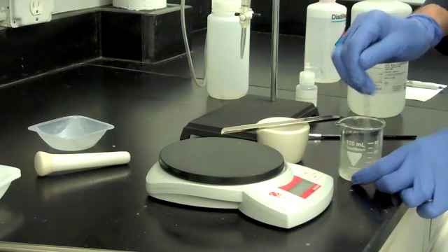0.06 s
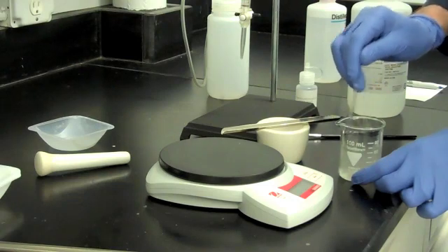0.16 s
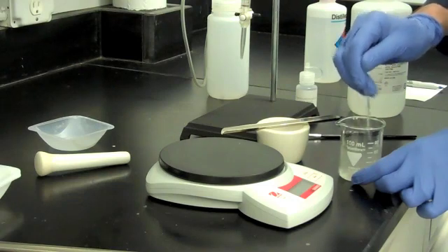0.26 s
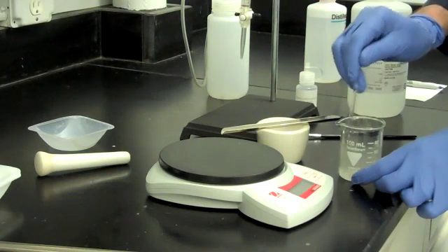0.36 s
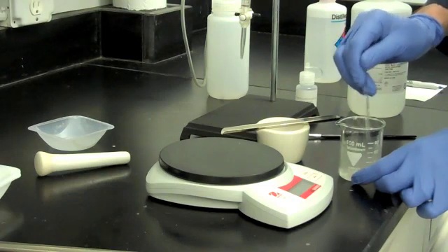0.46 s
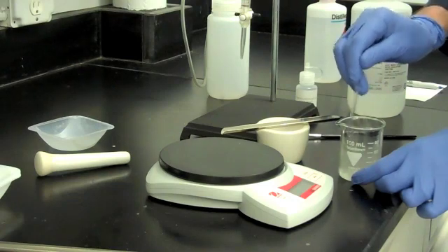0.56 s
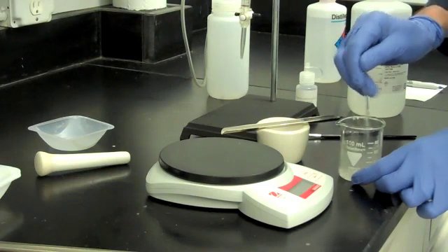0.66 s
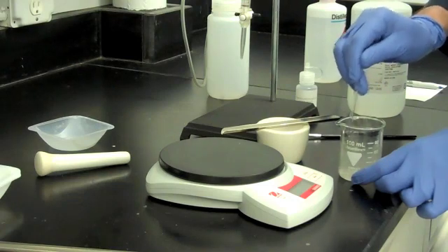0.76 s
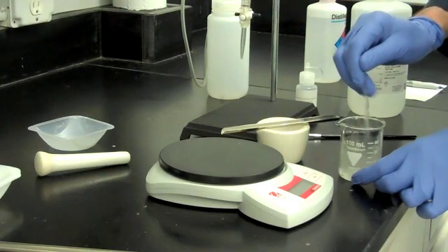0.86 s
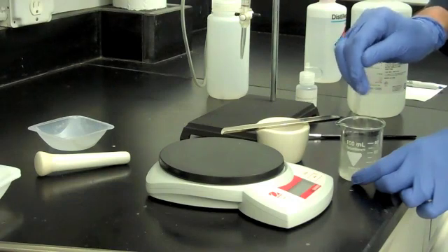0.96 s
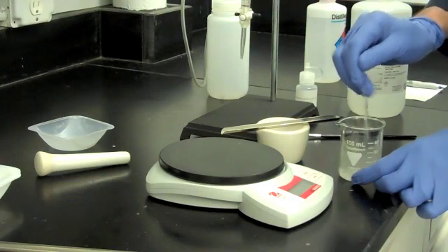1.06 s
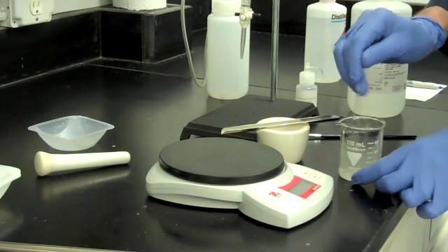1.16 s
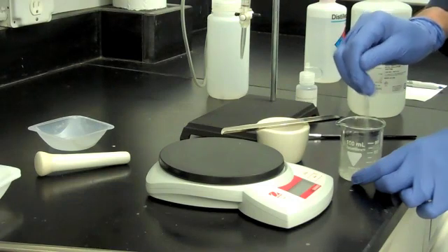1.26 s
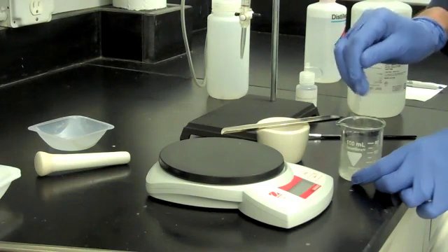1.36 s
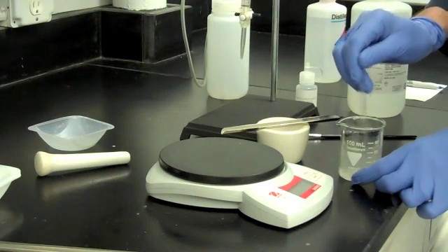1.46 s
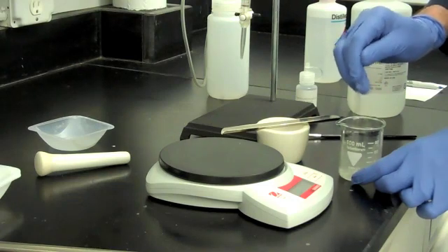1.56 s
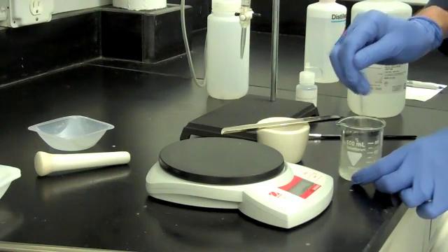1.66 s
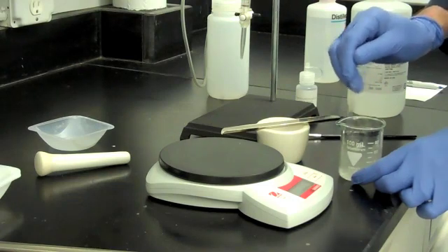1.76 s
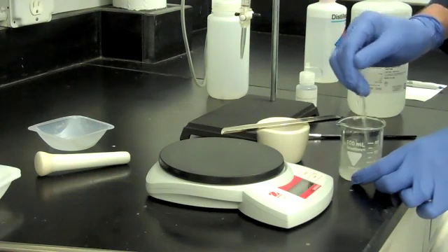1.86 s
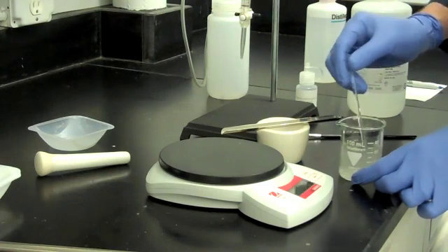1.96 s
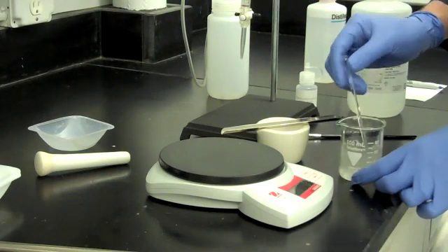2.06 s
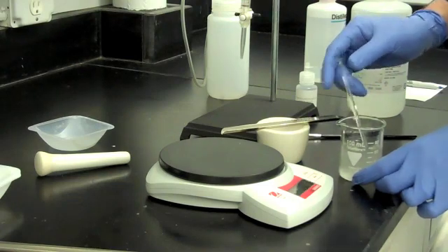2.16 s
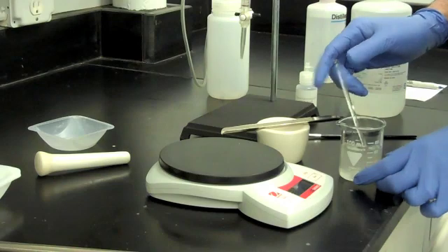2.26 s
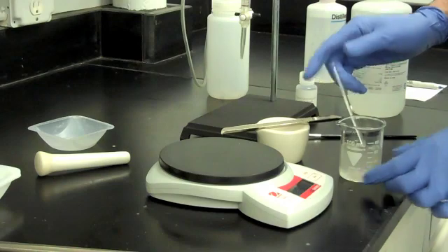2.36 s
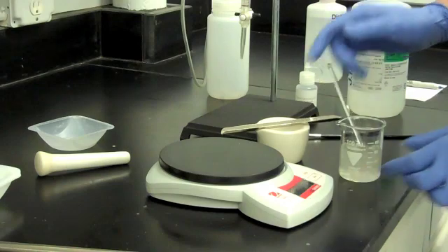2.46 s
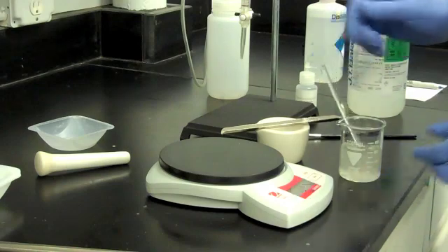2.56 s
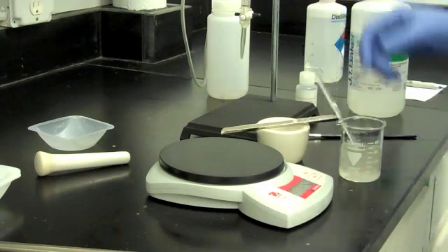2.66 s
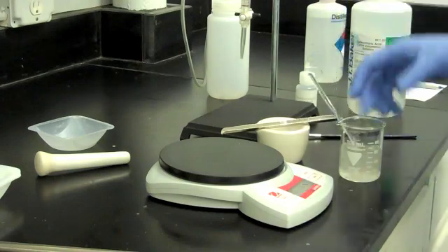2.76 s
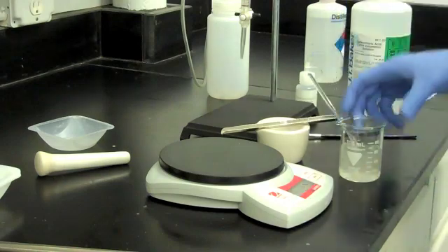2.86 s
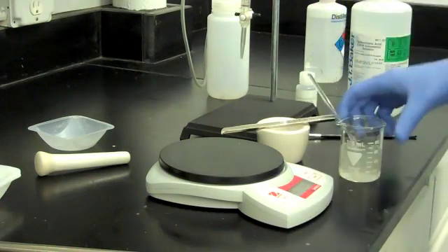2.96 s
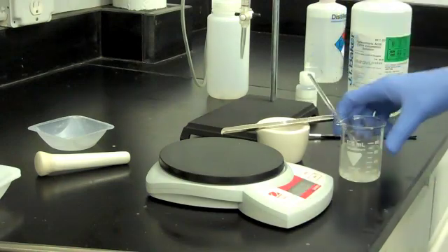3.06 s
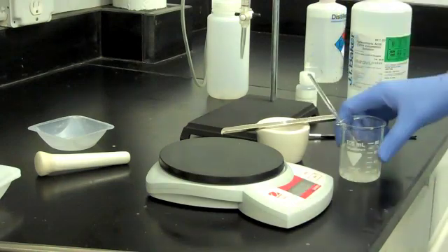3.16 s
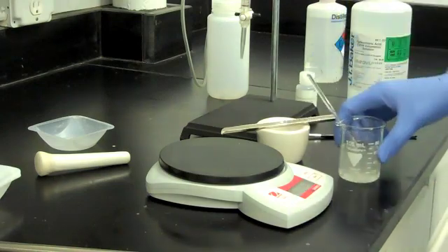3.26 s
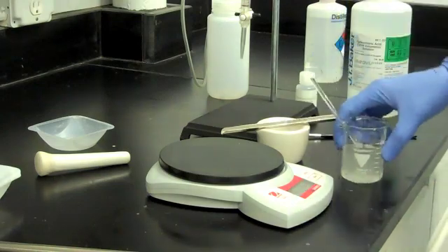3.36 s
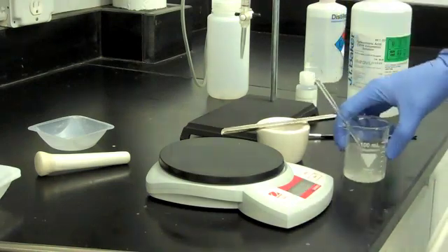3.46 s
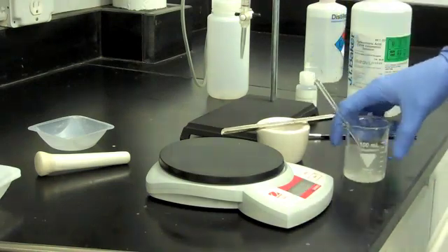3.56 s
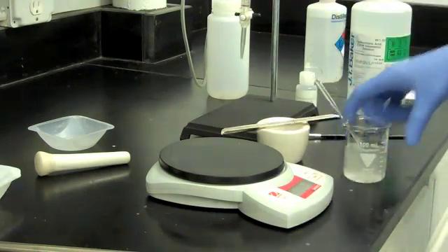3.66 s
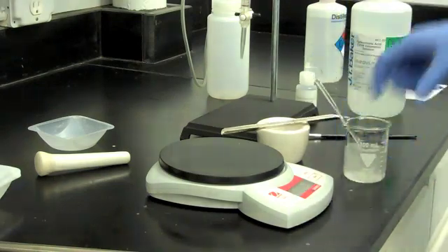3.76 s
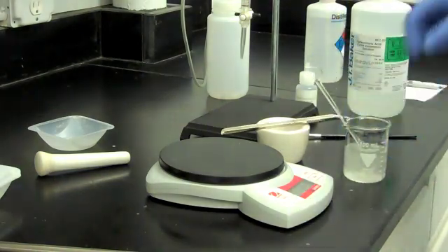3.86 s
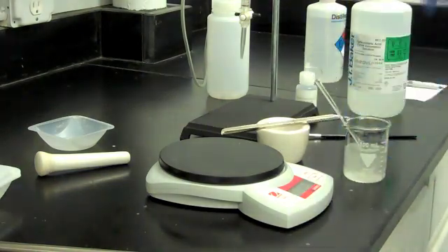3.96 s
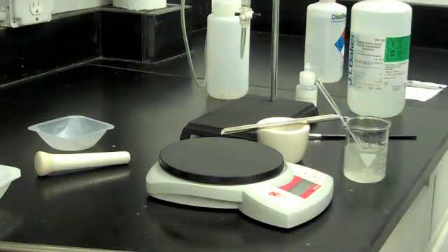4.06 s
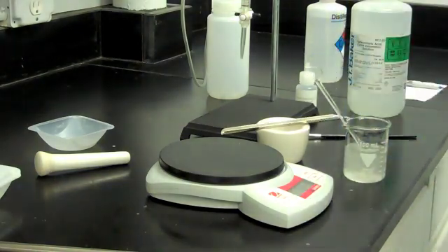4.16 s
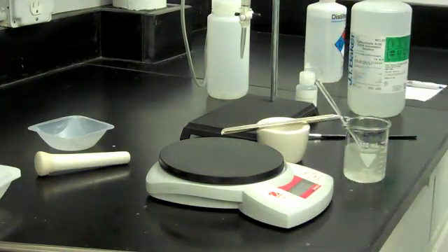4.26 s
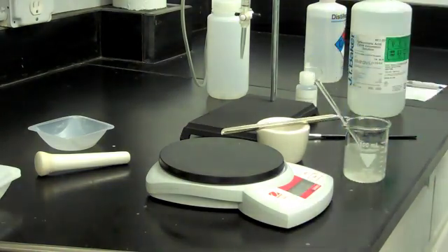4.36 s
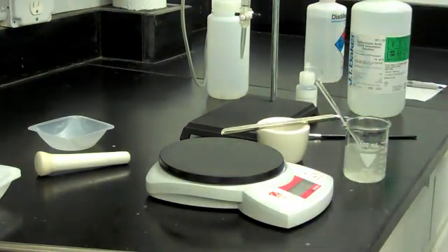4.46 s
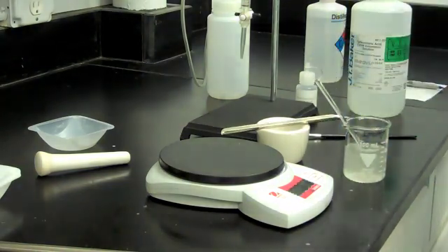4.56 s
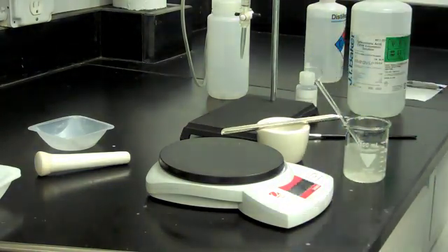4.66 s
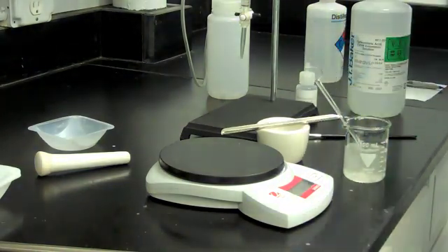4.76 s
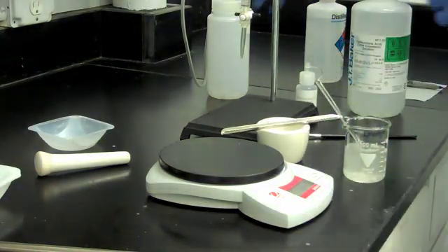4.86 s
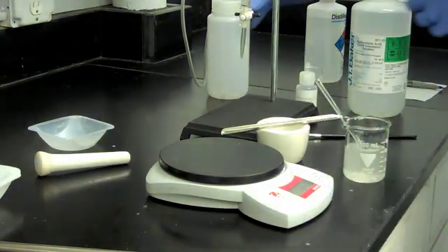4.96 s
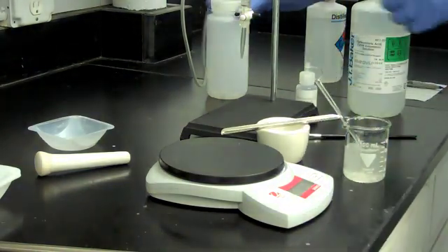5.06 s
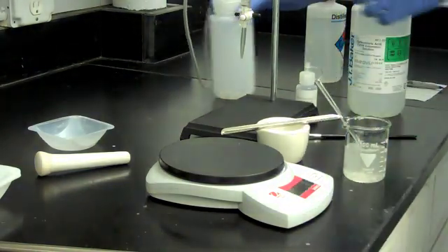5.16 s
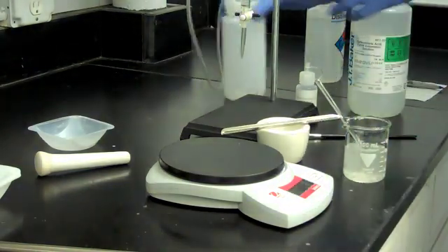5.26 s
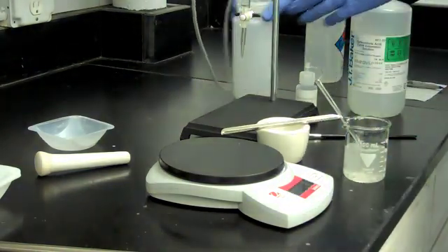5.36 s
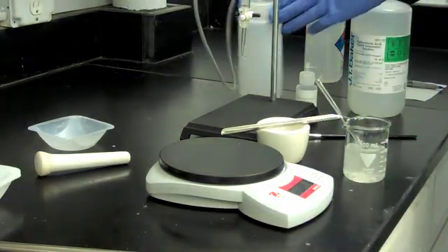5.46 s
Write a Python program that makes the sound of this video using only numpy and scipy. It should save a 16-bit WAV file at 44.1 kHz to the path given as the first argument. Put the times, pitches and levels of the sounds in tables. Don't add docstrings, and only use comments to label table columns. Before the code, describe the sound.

A glass rod stirs liquid in a small beaker with bright uneven clinks, drops and chatters on the rim, then hands rustle among bottles.

```python
import sys
import numpy as np
from scipy import signal
from scipy.fft import rfft, irfft, next_fast_len
from scipy.io import wavfile

SR = 44100
rng = np.random.default_rng(int(sys.argv[2]) if len(sys.argv) > 2 else 0)


def to_linear_factor(level_db):
    exponent = np.asarray(level_db, float) / 20
    return 10 ** exponent


def digitize_waveform(pressure):
    field = np.atleast_2d(pressure).T
    bounded = np.clip(field, -1, 1)
    quanta = np.round(bounded * 32767).astype(np.int16)
    wavfile.write(sys.argv[1], SR, quanta)


N = 243076
SECONDS = np.arange(N) / SR


def at_hz(points, hz):
    table_hz, value = np.array(points).T
    return np.interp(np.log(np.maximum(hz, 1)), np.log(table_hz), value)


def rms_one(x):
    return x / np.sqrt(np.mean(x ** 2) + 1e-20)


def colour(x, points, share=1):
    size = next_fast_len(N + 4096)
    gain = to_linear_factor(share * at_hz(points, np.fft.rfftfreq(size, 1 / SR)))
    return irfft(rfft(x, size) * gain, size)[..., :N]


def lean(pair, balance):
    return np.array([colour(pair[0], balance, .5), colour(pair[1], balance, -.5)])


def band(x, low_hz, high_hz):
    return signal.sosfilt(signal.butter(2, [low_hz, high_hz], "band", fs=SR, output="sos"), x)


def clicks_at(s, level_db):
    clicks = np.zeros(N)
    clicks[(np.asarray(s) * SR).astype(int)] = to_linear_factor(level_db)
    return clicks


def ring(clicks, hz, t60):
    r = to_linear_factor(-60 / (t60 * SR))
    w = 2 * np.pi * hz / SR
    return signal.lfilter([0, np.sin(w)], [1, -2 * r * np.cos(w), r * r], clicks + 1e-18)


def burst(clicks, hz, t60):
    return ring(ring(clicks, hz, t60), hz, t60)


def dying(clicks, t60):
    return signal.lfilter([1], [1, -to_linear_factor(-60 / (t60 * SR))], clicks + 1e-18)


def swell(s, length, level_db):
    out = np.zeros(N)
    span = slice(max(int((s - 2 * length) * SR), 0), int((s + 2 * length) * SR))
    out[span] = to_linear_factor(level_db) * np.exp(-np.abs(2.4 * (SECONDS[span] - s) / length) ** 1.8)
    return out


def wander(rate):
    r = np.exp(-2 * np.pi * rate / SR)
    return rms_one(signal.lfilter([1], [1, -2 * r, r * r], rng.standard_normal(N)))


def grit(per_s, uneven_db):
    sizes = to_linear_factor(uneven_db * np.minimum(rng.exponential(1, N), 3)) * rng.choice([-1, 1], N)
    return rms_one(sizes * (rng.random(N) < per_s / SR))


def stereo_noise(alike):
    mid, side = rng.standard_normal((2, N))
    return np.sqrt(1 + alike) * mid + np.sqrt(1 - alike) * side * [[1], [-1]]


# (f/Hz, level/dB)
AIR = [(12, -50), (20, -25), (60, -16), (193, -2), (399, -6.5), (446, -2.5), (485, -7.5), (624, -6.5),
       (849, -10), (1000, -4), (1090, -8.5), (3070, -21), (7730, -20.5), (13900, -30.5), (16000, -67.5)]
# (f/Hz, level/dB rms)
HUM = [(199, -66), (479.8, -61.5), (720.5, -66.5), (840, -63.5), (7880, -73), (11806, -73.5)]
# (f/Hz, likeness 0-1)
AIR_LIKENESS = [(60, 0.26), (180, 0.95), (550, 0.91), (900, 0.77), (1650, 0.057), (4970, 0.017),
                (15000, 0.041)]
# (f/Hz, left-right level/dB)
AIR_BALANCE = [(60, 1), (150, 1), (380, 2), (950, -2), (2380, 8), (5980, 6.5), (15000, -6)]


def ventilation():
    hz, alike = np.array(AIR_LIKENESS).T
    alike = np.clip(alike, .01, .99)
    mid, side = rng.standard_normal((2, N))
    mid = colour(mid, np.c_[hz, 10 * np.log10(1 + alike)])
    side = colour(side, np.c_[hz, 10 * np.log10(1 - alike)])
    air = to_linear_factor(-53.5) * rms_one(colour(np.array([mid + side, mid - side]), AIR))
    for hz, level_db in HUM:
        unsteady = to_linear_factor(2.34 * wander(14.7))
        air += to_linear_factor(level_db) * unsteady * rms_one(np.sin(2 * np.pi * hz * SECONDS + 0.67 * wander(2.3)))
    return lean(air, AIR_BALANCE)


# (f/Hz, t60/s)
LAB_T60 = [(500, 0.83), (3000, 0.54), (9000, 0.32), (15000, 0.19)]


def lab(x):
    t = np.arange(SR // 2) / SR
    edges_hz = 500 * 2 ** np.arange(0, 5.1, .5)
    white = rng.standard_normal((2, len(t)))
    onset = np.clip((t - .003) / 0.0038, 0, 1)
    tail = sum(band(white, low, high) * to_linear_factor(-60 * t / at_hz(LAB_T60, low))
               for low, high in zip(edges_hz, edges_hz[1:]))
    return signal.fftconvolve(x, tail * onset / np.sqrt(np.sum(tail ** 2) / 2), axes=1)[:, :N]


# (peak t/s, length/s, level/dB,
# brightness -1 drag, 0 creak, 1 swish)
STROKES = [(3.180, 0.031, -63, 0.98), (3.385, 0.055, -49.5, 0.39), (4.426, 0.047, -41, 0.8),
           (4.456, 0.037, -43.5, -1.08), (4.86, 0.039, -40.5, 0.16), (5.030, 0.15, -38.5, 0.47),
           (5.265, 0.02, -34.5, -0.83), (5.329, 0.075, -41.5, 0.64), (5.495, 0.14, -46.5, 0.7),
           (3.334, 0.44, -61, 0.026), (4.297, 0.32, -86, 0.67), (4.94, 1.7, -51, 0.75),
           (4.945, 0.97, -51, -0.51), (5.317, 0.099, -43.5, -1.24)]
# (peak t/s, length/s, level/dB, f/Hz)
SQUEAKS = [(.283, .022, -54, 5800), (.283, .022, -52, 6800), (2.755, .07, -51, 2580), (3.3, .14, -62, 1300),
           (3.36, .1, -62, 1750), (3.42, .1, -61, 1250), (3.41, .03, -62, 8250), (3.41, .03, -63, 6600),
           (4.25, .16, -67, 5520), (4.34, .14, -69, 5650), (4.433, .03, -46, 5550), (4.418, .03, -50, 4780),
           (4.492, .025, -62, 5400), (4.67, .16, -59, 4960), (4.58, .14, -63, 5020), (4.55, .16, -64, 3720),
           (4.74, .16, -67, 3680), (5, .1, -53, 1800)]
# (t/s, peak level/dB,
# f/Hz, t60/s)
KNOCKS = [
    (0.311, -29.5, 745, 0.19),
    (3.512, -32, 1110, 0.18),
    (4.838, -44, 2600, 0.05),
    (4.853, -43.5, 2460, 0.065),
    (4.983, -43, 1900, 0.14),
    (5.261, -51, 394, 0.34),
    (5.257, -27.5, 206, 0.14),
    (5.285, -32.5, 264, 0.51),
]
# (f/Hz, level/dB)
SWISH = [(1760, -46), (3000, -4.5), (5180, -3), (5570, -3.5), (6460, -5.5), (7200, -2.5), (13600, -18.5),
         (14400, -17), (15000, -62)]


def friction(home):
    return sum(swell(s, length, level_db - 19.5 * abs(bright - home))
               for s, length, level_db, bright in STROKES)


def hands():
    grain = stereo_noise(0.86) * to_linear_factor(2.2 * rng.exponential(1, N))
    out = friction(-1) * rms_one(band(grain, 433, 990))
    out += friction(0) * rms_one(band(grain, 720, 2890))
    out += friction(1) * rms_one(colour(grain, SWISH))
    for s, length, level_db, hz in SQUEAKS:
        out += swell(s, length, level_db) * rms_one(burst(grain, hz, .02))
    for s, peak_db, hz, t60 in KNOCKS:
        knock = band(grain * dying(clicks_at(s, peak_db), t60), hz * 0.61, hz * 1.52)
        out += band(knock, hz * .5, min(hz * 5.3, SR / 2.2))
    return out


# (t/s, level/dB)
TOUCHES = [(2.523, -56), (2.5567, -52), (2.5918, -44), (2.623, -48), (2.64, -44), (2.663, -51), (2.69, -52),
           (2.7104, -56), (2.735, -55), (2.75, -54), (2.785, -48), (2.8111, -54)]
# (t/s, level/dB, low f/Hz, high f/Hz)
TICKS = [
    (4.4122, -32, 4000, 6500),
    (4.43, -32, 4500, 6200),
    (4.8403, -25, 1200, 5530),
    (5.2561, -26, 500, 8000),
    (5.259, -29, 500, 3500),
    (2.786, -33, 800, 4500),
]
# (f/Hz, level/dB, t60/s)
RIM = [(962, -13, 0.16), (2496, -35, 0.13), (2600, -16, 0.024), (3004, -8, 0.027), (5040, -17, 0.036),
       (6420, -13, 0.032), (6240, -19, 0.031), (7560, -8, 0.029), (8270, -4.5, 0.045)]


def ticks():
    clicks = clicks_at(*np.transpose(TOUCHES))
    out = sum(to_linear_factor(mode_db) * ring(clicks, hz, 1.8 * min(t60, .04)) for hz, mode_db, t60 in RIM)
    for s, level_db, low_hz, high_hz in TICKS:
        click = np.zeros(2000)
        click[0] = to_linear_factor(level_db + 8)
        out[int(s * SR):][:len(click)] += band(click, low_hz, high_hz)
    return out


def rolling():
    times = 2.442 + np.cumsum([0, 0.096, 0.19, 0.21])
    shape_db = np.interp(SECONDS, times, [-12, 0, 0, -17], left=-120, right=-120)
    push = to_linear_factor(-47 + shape_db + 3.8 * wander(23)) * grit(1100, uneven_db=2.5)
    rings = sum(to_linear_factor(level_db) * ring(push, hz, 0.69 * t60) for hz, level_db, t60 in RIM)
    return to_linear_factor(-19.5) * band(rings, 710, 5900)


# (peak t/s, length/s, slosh level/dB, scrape level/dB)
DRAGS = [
    (.01, 0.045, -60, -46),
    (0.177, 0.25, -64, -39.5),
    (0.333, 0.38, -43.5, -64),
    (0.763, 0.37, -56, -57),
    (1.417, 0.13, -36.5, -43),
    (1.9, 0.2, -43.5, -43),
    (1.001, 2.3, -79, -67),
]


def dragging():
    gurgle = sum(swell(s, length, slosh_db) for s, length, slosh_db, _ in DRAGS)
    rub = sum(swell(s, length, scrape_db) for s, length, _, scrape_db in DRAGS)
    drops = grit(250, uneven_db=0.0)
    slosh = sum(ring(np.roll(drops, 5000 * k), hz, 14 / hz)
                for k, hz in enumerate(np.geomspace(900, 2000, 8)))
    scrape = colour(stereo_noise(.3) * to_linear_factor(3.0 * wander(40)), CRACK)
    scrape = rms_one(band(scrape, 4000, 18500))
    return to_linear_factor(-11.0) * gurgle * rms_one(slosh) + to_linear_factor(-14.5) * rub * scrape


# (t/s, peak level/dB, f/Hz, t60/s)
POCKETS = [(.05, -39, 1050, 0.27), (.52, -39, 1058, .2), (.606, -39, 1004, 0.19), (1.032, -35, 1061, .3),
           (1.64, -35, 1051, .25), (.049, -32.5, 1747, 0.18), (0.448, -34, 1266, 0.14),
           (.448, -37, 1040, 0.44), (0.708, -41, 943, 0.29), (.912, -36, 980, 0.14),
           (0.3063, -21, 1860, 0.11), (0.6978, -34.5, 2040, 0.074), (0.818, -31, 1725, 0.084),
           (1.2992, -36, 985, 0.19), (1.3588, -38, 950, 0.073), (1.373, -26.5, 1314, 0.041),
           (1.4502, -33.5, 1104, 0.082), (1.382, -39.5, 1180, 0.092), (1.412, -30, 1283, 0.057),
           (1.4622, -24, 2010, 0.03), (1.4785, -32, 1847, 0.066)]


def pockets():
    out, t = np.zeros(N), np.arange(SR // 4) / SR
    for s, peak_db, hz, t60 in POCKETS:
        shape = to_linear_factor(peak_db - 4 - 60 * t / t60) * (1 - np.exp(-t / .002))
        out[int(s * SR):][:len(t)] += shape * np.sin(2 * np.pi * hz * (t + 0.69 * t ** 2))
    return out * to_linear_factor(3.0 * wander(120))


GROUP_EDGES_HZ = [450, 2150, 2750, 4300, 7000, 9800, 15500]
# (f/Hz, level/dB)
CRACK = [(290, -53), (500, -19.5), (807, -19), (1050, -16), (1530, -13.5), (2130, -2.5), (2360, -3),
         (2610, -9), (3060, -2), (4470, -13), (6700, -5.5), (8580, -4.5), (9800, -18.5), (10600, -22),
         (11400, -28), (12800, -17), (14000, -27.5), (16000, -90)]
# (t/s, f/Hz)
SWIRL = [(0.08, 2414), (0.3, 2398), (0.4, 2446), (0.45, 2403), (1.14, 2418), (1.38, 2410), (1.48, 2406),
         (1.57, 2441), (1.65, 2427), (1.74, 2387), (1.9, 2383), (2.2, 2450), (2.6, 2434)]


def glass(blows, modes, thud_db, detune, ring_db, crack_db, snap_db, crack_t60, spread_db, blur):
    s, blow_db, depth, edge, _ = np.transpose(blows)
    at, out = (s * SR).astype(int), np.zeros((2, N))
    span = slice(at[0], min(at[-1] + SR // 2, N))
    t = SECONDS[span]
    thud, middle = thud_db + 0.64 * depth, -2.5 + 0.42 * depth
    groups_db = blow_db + np.array([thud, thud - 3.0, depth, middle, -9.0 + 0 * s, edge])
    chance = rng.standard_normal((len(s), len(modes)))
    cloud = rms_one(colour(stereo_noise(0.25), CRACK))
    bend = (np.interp(t, *np.transpose(SWIRL)) / 2420) ** 0.3
    beat = wander(75)
    last = np.maximum(np.searchsorted(s, t) - 1, 0)
    for k, (mode_hz, level_db, t60) in enumerate(modes):
        hz = mode_hz * (1 + detune * chance[last, k - 1])
        group_db = groups_db[np.searchsorted(GROUP_EDGES_HZ, mode_hz) - 1]
        start_db = np.full(N, -200.)
        start_db[at] = group_db + spread_db * chance[:, k] + ring_db + level_db
        fall_db = 60 * t / t60
        height = to_linear_factor(np.maximum.accumulate(start_db[span] + fall_db) - fall_db)
        height = signal.lfilter([.04], [1, -.96], height * to_linear_factor(2.5 * np.roll(beat, 9000 * k)[span]))
        phase = np.cumsum(2 * np.pi * hz * bend / SR) + blur * np.roll(beat, 7000 * k + 4000)[span]
        out[:, span] += height * np.sin(phase + [[0], [rng.normal(0, 0.35)]])
    for level_db, low, high in zip(groups_db, GROUP_EDGES_HZ, GROUP_EDGES_HZ[1:]):
        clicks = clicks_at(s, level_db + crack_db)
        fade = dying(clicks, crack_t60) + to_linear_factor(-21.0) * dying(clicks, 7.0 * crack_t60)
        crack = rms_one(band(cloud[:, span], low, high)) * fade[span]
        out[:, span] += band(crack, low * 1.117, high * 1.001)
    return out + burst(clicks_at(s, blow_db + snap_db - 19), 8200, .007)


# (t/s, blow level/dB, depth and edge/dB re blow, bell level/dB rms)
JOLTS = [
    (3.3899, -52, -20, -23, -90),
    (3.5163, -32, -14.5, -16, -90),
]
# (f/Hz, level/dB, t60/s)
HELD = [(1440, -19, 0.22), (6400, -13, 0.06), (7670, -2, 0.07), (8200, -0.5, 0.052)]


def jolts():
    return glass(JOLTS, HELD, thud_db=9.0, detune=0, ring_db=-0.5, crack_db=-3.5, snap_db=-6,
                 crack_t60=0.056, spread_db=3.5, blur=0.77)


ROCKS = [(2.558, -45.5, -8, -24.5, -60), (2.572, -40, -13, -22, -65), (2.592, -40.5, -17, -26, -62),
         (2.623, -40.5, -7.5, -24, -60), (2.709, -43, -12, -22, -63), (2.735, -55, -25, -22, -70),
         (2.772, -39.5, -20, -22, -62), (2.785, -48.5, -6, -22, -60), (2.812, -47, -23, -22, -61)]


def rocking():
    return glass(ROCKS, RIM, thud_db=3, detune=0.0043, ring_db=7.5, crack_db=-8.0, snap_db=-20,
                 crack_t60=0.13, spread_db=3.5, blur=1.0)


TAPS = [
    (2.2906, -23.5, -21, -14, -45),
    (2.295, -29.5, -28, -12, -37),
    (2.303, -20, -28, -16, -39),
    (2.315, -23.5, -13, -33, -26.5),
    (2.324, -42, -20, -30, -33.5),
]
# (f/Hz, level/dB, t60/s)
DRY = [(985, -6.5, 0.44), (2960, 2, 0.18), (5050, -4.5, 0.07), (6340, -6, 0.17), (6200, -12, 0.15),
       (8200, -10, 0.067), (8230, 1, 0.13), (8750, -28, 0.26), (13000, -4, 0.027), (13290, -16, .04)]


def chatter():
    return glass(TAPS, DRY, thud_db=-2.5, detune=0, ring_db=0.5, crack_db=-4.0, snap_db=-18,
                 crack_t60=0.062, spread_db=3.0, blur=0.77)


DROP = [
    (1.8666, -17, -20, -20.5, -47),
]
# (f/Hz, level/dB, t60/s)
HIGH = [(951, -7.5, 0.35), (1900, -17, 0.56), (2650, -8, 0.29), (2994, -7, 0.54), (3068, -0.5, 0.65),
        (5140, -1.5, 0.3), (6200, -9, 0.21), (6630, -6, 0.21), (6370, -13, 0.23), (8400, -13, 0.083),
        (8310, 4.5, 0.22), (8560, -16, 0.22), (12700, 5, 0.047)]


def last_knock():
    return glass(DROP, HIGH, thud_db=1.5, detune=0, ring_db=-4.0, crack_db=0.0, snap_db=-5.0,
                 crack_t60=0.056, spread_db=-2.0, blur=1.0)


# (t/s, low pair, high pair, top pair and tip burst level/dB)
ANGLES = [(.0479, -25, -35, -44, -40), (.3047, -47.5, -46, -42, -40), (.4465, -36, -43, -45, -25),
          (.515, -55, -55, -55, -50), (.605, -56, -50, -48, -44), (.7087, -58, -50, -48, -36),
          (.7942, -50, -55, -39, -43), (.822, -34, -55, -52, -55), (.9111, -60, -55, -55, -35),
          (.9792, -58, -31, -52, -39), (1.0306, -32, -46, -40, -42), (1.1198, -58, -58, -54, -35),
          (1.1705, -39, -46, -52, -43), (1.2979, -60, -31, -52, -46), (1.482, -58, -50, -58, -47),
          (1.5837, -36, -38, -57, -39), (1.6394, -32, -17, -37, -41), (1.6915, -48, -45, -31, -38),
          (1.8667, -46, -46, -52, -45)]
# (f/Hz, t60/s)
ANGLE_MODES = [(5080, 0.089), (5720, 0.065), (10400, 0.06)]
# (t/s, f/Hz, level/dB, t60/s)
CLEAR = [(1.8667, 5120, -29, 0.39), (1.8667, 5593, -34, 0.13), (1.8667, 6535, -44, 0.14),
         (1.6394, 6570, -28, .08), (1.6915, 14300, -36, 0.066), (1.6915, 10900, -38, .05),
         (2.2906, 7650, -38, .1), (2.303, 6350, -43, 0.21)]


def angles():
    s, *pairs_db, tip_db = np.transpose(ANGLES)
    out = burst(clicks_at(s, tip_db - 14), 8100, .009)
    for (hz, t60), level_db in zip(ANGLE_MODES, pairs_db):
        clicks = clicks_at(s, level_db - 3)
        out += ring(clicks, hz, t60) - ring(clicks, hz * 1.0236, 0.42 * t60)
    t = np.arange(SR // 2) / SR
    for s, hz, level_db, t60 in CLEAR:
        shape = to_linear_factor(level_db - 60 * t / t60) * (1 - np.exp(-t / .001))
        out[int(s * SR):][:len(t)] += shape * np.sin(2 * np.pi * hz * t)
    return out


# (t/s, low f/Hz, low level/dB, high f/Hz, high level/dB)
ROD = [(0.0467, 6850, -26.5, 8200, -39), (0.3056, 6860, -23, 8050, -32), (0.4454, 6650, -41, 7980, -27),
       (0.515, 6860, -35.5, 8340, -32.5), (0.605, 6675, -31, 8400, -25.5), (0.7085, 6712, -27, 8460, -26.5),
       (0.7942, 6980, -30.5, 8490, -29), (0.82, 6750, -29, 8500, -53), (0.9116, 6700, -36, 8240, -33),
       (0.9797, 6669, -38, 8414, -39), (1.0312, 6600, -44, 8200, -25), (1.121, 6675, -49, 8300, -44),
       (1.1696, 6700, -37.5, 8300, -30), (1.2983, 6691, -31, 7900, -40), (1.482, 7000, -37, 8455, -35),
       (1.5844, 6718, -30.5, 8400, -43), (1.6386, 6573, -24.5, 8370, -38), (1.6917, 6615, -21, 8460, -26)]
# (t/s, second bell level/dB, middle f/Hz, middle level/dB, upper f/Hz)
WALL = [(0.0482, -39, 3400, -36, 7300), (0.3054, -32.5, 3440, -44.5, 7640), (0.4454, -53, 3390, -44, 7918),
        (0.515, -47, 3440, -54, 7700), (0.605, -45, 3340, -53, 7250), (0.7085, -37, 3500, -57, 7800),
        (0.7942, -37, 3510, -47.5, 7300), (0.821, -47, 3130, -58, 7960), (0.9113, -46, 3570, -57, 7400),
        (0.9793, -66, 3200, -55, 7740), (1.0312, -46, 3030, -51, 7811), (1.1198, -64, 3149, -55, 7840),
        (1.1703, -36, 3330, -53, 7400), (1.2978, -35.5, 3140, -66, 7570), (1.482, -37, 3150, -64, 7570),
        (1.5837, -47, 3190, -63, 7800), (1.6392, -45, 3096, -43, 7940), (1.6915, -37, 3620, -51, 7700)]


def partials():
    out, t = np.zeros((2, N)), np.arange(SR // 3) / SR
    smear = wander(57)
    for rod, wall in zip(ROD, WALL):
        s, low_hz, low_db, tip_hz, tip_db = rod
        _, second_db, middle_hz, middle_db, upper_hz = wall
        modes = [(low_hz, low_db + 1.5, 0.072, 0.6),   # f/Hz, level/dB, t60/s, smear
                 (tip_hz, tip_db + 5.5, 0.06, 0.6),
                 (6260, second_db + 3.5, 0.17, .3),
                 (middle_hz, middle_db + 7.0, 0.18, 1.6),
                 (upper_hz, low_db - 1, 0.057, 0.6)]
        for hz, level_db, t60, share in modes:
            shape = to_linear_factor(level_db - 60 * t / t60) * (1 - np.exp(-t / .0006))
            phase = 2 * np.pi * hz * t + share * np.roll(smear, int(hz))[:len(t)] + rng.uniform(0, 6.4)
            out[:, int(s * SR):][:, :len(t)] += shape * np.sin(phase + [[0], [rng.normal(0, 1.0)]])
    return out * to_linear_factor(2.5 * wander(60))


# (t/s, level/dB rms)
SETTLES = [(.095, -49), (.385, -43), (2.352, -33), (2.387, -49.5), (2.415, -43.5), (2.457, -56),
           (2.47, -48.5)]


def bell():
    struck = [(row[0], row[4]) for row in STIRS + DROP + TAPS + ROCKS]
    s, level_db = np.array(sorted(struck + list(SETTLES))).T
    last = np.searchsorted(s, SECONDS) - 1
    age = SECONDS - s[np.maximum(last, 0)]
    wait = np.append(s, 99)[last + 1] - SECONDS
    muffle_db = 20 * np.exp(-wait / 0.0088) * (SECONDS < TAPS[0][0])
    height = to_linear_factor(level_db[last] - 60 * age / 0.87 - muffle_db + 1.1 * wander(20.4)) * (last >= 0)
    height += sum(swell(s, length, scrape_db - 16) for s, length, _, scrape_db in DRAGS)
    height *= 1 - 0.5 * np.sin(np.pi * 3.65 * age) ** 2
    height = signal.lfilter([.006], [1, -.994], height)
    phase = np.cumsum(2 * np.pi * np.interp(SECONDS, *np.transpose(SWIRL)) / SR)
    return to_linear_factor(2.5) * height * np.sin(phase + [[0], [.4]])


STIRS = [(0.0478, -8, -21, -17.5, -43), (0.3046, -5.5, -30, -12, -39.5), (0.4457, -7.5, -19, -17.5, -33.5),
         (0.515, -16.5, -29, -12.5, -42), (0.605, -14, -30, -7.5, -45), (0.668, -23.5, -29, -14, -54),
         (0.7091, -12.5, -30, -10.5, -42), (0.794, -14.5, -30, -10, -57), (0.822, -27, -7, -27, -44),
         (0.9112, -13, -34.5, -11, -47.5), (0.979, -16.5, -38, -10, -70), (1.0307, -10.5, -14, -19, -32.5),
         (1.1198, -20.5, -40, -14, -41), (1.1712, -16, -32.5, -8, -48), (1.2977, -11.5, -33.5, -9.5, -41),
         (1.371, -25, -24, -29, -45), (1.4136, -40, -4, -25, -49), (1.461, -35.5, -19, -23, -46),
         (1.482, -15, -35, -12, -44.5), (1.5845, -12.5, -39.5, -13.5, -50),
         (1.6392, -7, -21.5, -20.5, -36.5), (1.6917, -10.5, -19.5, -5.5, -36)]
# (f/Hz, level/dB, t60/s)
WET = [(1085, -14, 0.49), (3140, -17, 0.61), (3430, -12.5, 0.18), (5020, -25, 0.076), (5680, -6.5, 0.071),
       (7460, -13, 0.079), (9100, -7, 0.06), (10200, -13.5, 0.081), (10640, -13.5, 0.091),
       (12600, -15, 0.059), (12870, -7.5, 0.059), (12900, -4.5, 0.044), (13600, -6, .045)]


def stirring():
    return glass(STIRS, WET, thud_db=-2.5, detune=.012, ring_db=-4, crack_db=-3.0, snap_db=-12.0,
                 crack_t60=0.053, spread_db=4.0, blur=1.0)


# (f/Hz, left-right level/dB)
NEAR_BALANCE = [(60, 1), (130, 0), (290, -1), (640, -5), (1410, 5), (3100, 8.5), (6820, 12), (15000, 6)]


def scene():
    near = hands() + ticks() + rolling() + dragging() + pockets()
    near += jolts() + rocking() + chatter() + last_knock()
    near += angles() + partials() + stirring()
    return lean(near + bell() + to_linear_factor(-7.0) * lab(near), NEAR_BALANCE) + ventilation()


def top_cut(x):
    return signal.sosfilt(signal.butter(12, 16470, fs=SR, output="sos"), x)


def record(dry):
    ports = dry + to_linear_factor(-5.5) * band(dry, 6220, 8380) * [[1], [.3]]
    ports[0] = np.roll(ports[0], 1)
    rounded = 1.476 * np.tanh(ports / 1.533)
    mix = signal.sosfilt(signal.butter(4, 14500, fs=SR, output="sos"), rounded)
    return top_cut(mix)


dry = scene()
out = record(dry)
digitize_waveform(out)
```